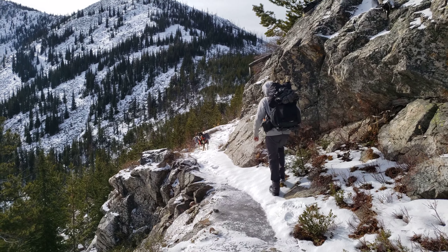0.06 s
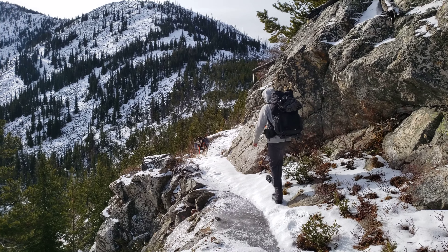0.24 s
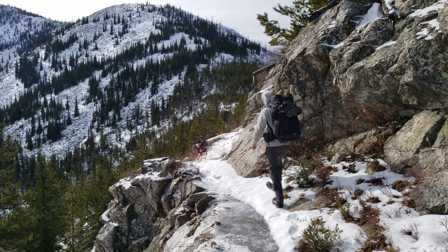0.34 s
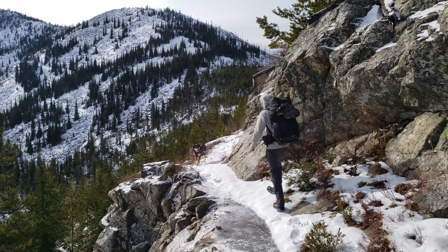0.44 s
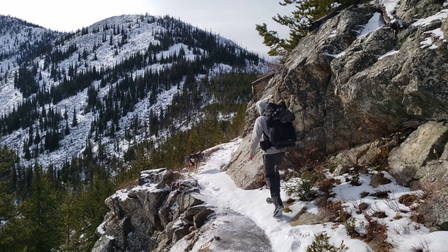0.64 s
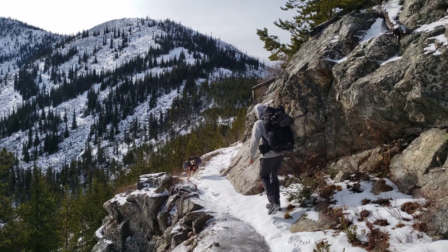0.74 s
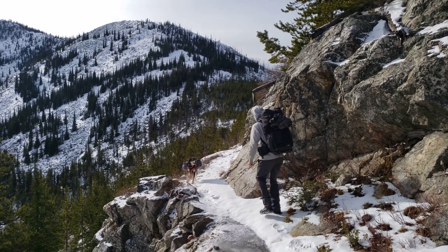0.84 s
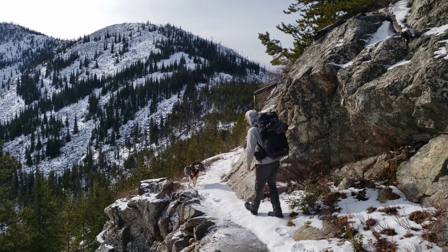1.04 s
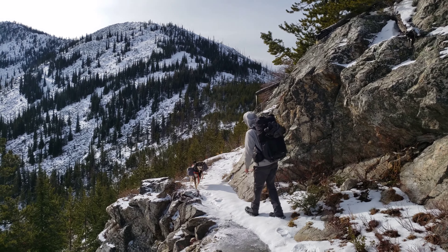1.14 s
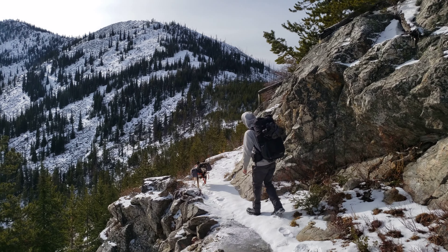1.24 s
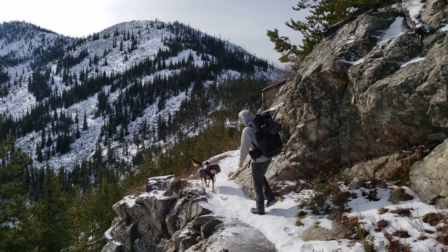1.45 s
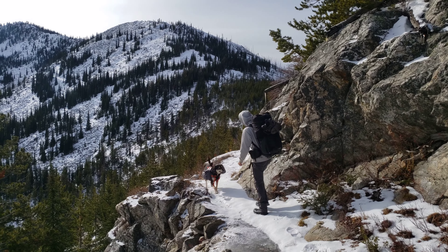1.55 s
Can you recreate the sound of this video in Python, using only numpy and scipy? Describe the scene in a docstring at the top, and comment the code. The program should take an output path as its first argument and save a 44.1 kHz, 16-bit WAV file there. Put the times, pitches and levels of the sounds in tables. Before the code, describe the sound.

Irregular snow footsteps, close to a stereo outdoor microphone: a soft scuff with cloth rustle, then sharper crunches and a heavy thud amid wind rumble, finally faint scuffs and a brighter jingle of collar tags.

```python
"""Packed, icy snow trail in open air: a hiker walks behind a dog whose collar tags jingle.
Boots crunch, scuff and thud: noise bursts for crust and slides, damped low swings for blows.
Cloth rubs close to the left microphone as grainy noise with swelling resonances; a fine hiss flickers.
Tags ring as decaying sines with scattered copies; ice snaps are brief ticks.
Gusts of wind buffet each microphone port on its own, as low noise under separate level curves."""
import sys
import numpy as np
from scipy import signal
from scipy.fft import rfft, irfft
from scipy.io import wavfile
from scipy.ndimage import uniform_filter1d

SR = 44100
rng = np.random.default_rng(int(sys.argv[2]) if len(sys.argv) > 2 else 0)


def pcm_store(signal):
    """Save signal as 16-bit PCM."""
    levels = np.round(np.clip(np.atleast_2d(signal), -1, 1) * 32767)
    wavfile.write(sys.argv[1], SR, levels.astype(np.int16).T)


N = 70560
TIME = np.arange(N) / SR


def amp(db):
    """Converts decibels to gain."""
    return 10 ** (np.asarray(db) / 20)


def evened(x):
    """Scales to an rms of one."""
    return x / np.sqrt(np.mean(x ** 2) + 1e-20)


def curve(points):
    """Gain over time, interpolated in dB from (time_s, level_db) points."""
    return amp(np.interp(TIME, *np.transpose(points)))


def add(mix, start_s, sound):
    """Adds a stereo sound to the mix in place, cut off at the end."""
    part = mix[:, max(round(start_s * SR), 0):][:, :sound.shape[1]]
    part += sound[:, :part.shape[1]]


def colour(x, table, bass_db=0, treble_db=0, size=4096):
    """Minimum-phase filter per table channel; the first has unit power before bass and treble shelves."""
    bass_hz, treble_hz = 603, 3450
    hz = abs(np.fft.fftfreq(size, 1 / SR)) + 1
    table_hz, *columns_db = np.transpose(table)
    gain = amp([np.interp(np.log(hz), np.log(table_hz), column) for column in columns_db])
    gain = gain / np.sqrt(np.mean(gain[0] ** 2))
    bass_shelf_db = bass_db / (1 + (hz / bass_hz) ** 2)
    treble_shelf_db = treble_db / (1 + (treble_hz / hz) ** 2)
    gain = gain * amp(bass_shelf_db + treble_shelf_db)
    # phase from the Hilbert transform of log gain
    spectrum = np.exp(np.conj(signal.hilbert(np.log(gain + 1e-6))))
    taps = np.fft.ifft(spectrum).real[:, :size // 2]
    return signal.fftconvolve(np.atleast_2d(x), taps, axes=1)[:, :x.shape[-1]]


def grains(n, grain_db, grain_s, same):
    """Two noises, correlated by same, whose shared level wanders in dB between knots grain_s apart."""
    knots = rng.standard_normal(N)
    wander = np.interp(np.arange(n) / SR / grain_s, np.arange(N), knots)
    burst = amp(grain_db * np.clip(wander, -2, 2))
    a, b = rng.standard_normal((2, N))[:, :n]
    right = same * a + np.sqrt(1 - same ** 2) * b
    return evened(burst * np.array([a, right]))


def resonate(x, hz, width_hz):
    """Steep resonance following hz: shift to zero, low-pass, shift back; scaled to an rms of one."""
    turn = np.exp(2j * np.pi * np.cumsum(hz * np.ones(N)) / SR)
    b, a = signal.butter(2, width_hz / 2, fs=SR)
    return evened((turn * signal.lfilter(b, a, x / turn)).real)


def muffled(x):
    """The right port hears a weaker, duller sound; the left is unchanged."""
    # loss at the right port: freq_hz, gain_db
    right_shade = [(400, -8), (1300, -17.5), (2300, -15.5), (4000, -22), (6500, -41.5), (10500, -13),
                   (14000, -49)]
    shade_hz, shade_db = np.transpose(right_shade)
    hz = np.fft.rfftfreq(2 * N, 1 / SR) + 1
    gain = amp(np.interp(np.log(hz), np.log(shade_hz), shade_db))
    right = irfft(rfft(x[1], 2 * N) * gain)[:N]
    return np.array([x[0], right])


def wind():
    """Eddies thump on each port separately: low noise, levelled, then driven by that port's gusts."""
    # wind pressure per port: time_s, level_db
    gust_left = [(0, -48), (.2, -44), (.28, -36.5), (.32, -29), (.4, -45), (.445, -25.5), (.475, -36.5),
                 (.51, -26.5), (.6, -48), (.65, -28), (.71, -46.5), (.74, -25), (.815, -54), (.86, -18.5),
                 (.895, -31), (.955, -25.5), (1.01, -38), (1.05, -30), (1.115, -30), (1.18, -86)]
    gust_right = [(0, -48.5), (.25, -42), (.58, -38), (.68, -30.5), (.75, -38.5), (.92, -36.5), (1.04, -52),
                  (1.18, -43), (1.3, -53.5), (1.6, -62)]
    # buffeting spectrum before levelling: freq_hz, relative_db
    buffet = [(22, -39.5), (36, -14), (60, 6), (90, -3), (130, -9.5), (200, -20.5), (400, -39),
              (900, -58.5), (3000, -73.5)]
    eddies = colour(rng.standard_normal((2, N + SR)), buffet)[:, SR:]  # drop filter onset
    running_power = uniform_filter1d(eddies ** 2, size=1500, axis=1)
    eddies = eddies / np.sqrt(running_power + 1e-12)
    return eddies * np.array([curve(gust_left), curve(gust_right)])


def cloth():
    """Fabric slides in tiny slips; a hollow, wavering resonance and brighter swishes swell and fade."""
    # broadband rub level: time_s, level_db
    rub_level = [(0, -54), (.06, -49.5), (.2, -43.5), (.27, -38.5), (.35, -46.5), (.43, -54), (.57, -56),
                 (.67, -59.5), (.8, -72), (.92, -70), (1.35, -70.5), (1.6, -79.5)]
    # rub spectrum: freq_hz, relative_db
    rub = [(306, 0), (567, -6), (1120, -3.5), (1540, -8.5), (2570, -7.5), (4470, -8), (5830, -15.5),
           (6960, -9), (8670, -17), (12700, -11), (15800, -9.5)]
    # bright resonances: centre_hz, width_hz, peak_s, swell_s, level_db
    swishes = [(6800, 1900, 0.19, 0.049, -53), (12550, 2900, 0.27, 0.063, -52.5)]
    ring_hz, ring_width_hz, ring_waver_share = 2120, 400, .025
    ring_peak_s, ring_swell_s, ring_db = 0.26, 0.15, -53

    slips = grains(N, grain_db=2.6, grain_s=.0009, same=0.42)
    waver = evened(uniform_filter1d(rng.standard_normal(N), size=900))
    wavering_hz = ring_hz * (1 + ring_waver_share * waver)
    hollow_ring = (wavering_hz, ring_width_hz, ring_peak_s, ring_swell_s, ring_db)
    swells = 0
    for hz, width_hz, peak_s, swell_s, level_db in [hollow_ring, *swishes]:
        envelope = np.exp(-((TIME - peak_s) / swell_s) ** 2)
        swells = swells + resonate(slips, hz, width_hz) * amp(level_db) * envelope
    return colour(slips * curve(rub_level), rub) + swells


def hiss():
    """Fine, flickering hiss, mostly on the left: grainy noise, nearly independent per port."""
    # level: time_s, level_db
    hiss_level = [(0, -58.5), (.5, -55), (.66, -54.5), (.79, -56), (.92, -56), (1.07, -56), (1.15, -57.5),
                  (1.3, -54), (1.36, -75), (1.43, -62), (1.48, -57), (1.6, -55)]
    # spectrum per port: freq_hz, left_db, right_db
    hiss_colour = [(96, -56, 6.5), (286, -20, -10.5), (1390, -21.5, -26.5), (3270, -21.5, -23.5),
                   (6480, -4, -39), (8200, -14.5, -37), (10700, -5.5, -19.5), (14100, -7.5, -28)]
    noise = grains(N, grain_db=3.5, grain_s=0.0082, same=0.078)
    return colour(noise * curve(hiss_level), hiss_colour)


def tags(count=12, detune=0.0015):
    """Two small metal tags ring and flutter over a longer, low ring; rock and snow scatter the sound."""
    # knocks: start_s, level_db, upper_tag_extra_db
    clinks = [(0.014, -53, 5), (0.093, -50, 5.5), (0.338, -51, 1), (0.551, -50.5, -13), (0.684, -49.5, 1),
              (0.695, -42.5, -2.5), (0.814, -55, -4), (0.967, -51.5, -2), (1.052, -43, -4.5),
              (1.103, -54.5, 0), (1.28, -50.5, -5), (1.299, -45.5, -9.5), (1.37, -49, -2.5),
              (1.461, -48.5, -0.5), (1.524, -36.5, -4)]
    # decaying modes: pitch_hz, level_db, t60_s, tag (0 lower, 1 upper)
    tag_modes = [(6430, -28, .35, 0), (10144, 0.5, 0.11, 0), (11086, 1, .12, 1), (16100, -14, .06, 0)]
    low_hz, low_db, low_t60_s = 5510, -62, .22  # same level at every clink
    rise_s, flutter_share, flutter_s = .003, .45, .004
    scatter_gain, scatter_mean_s = .35, .015

    out, t = np.zeros((2, N)), TIME[:SR // 3]
    knots_s = np.arange(0, t[-1], flutter_s)
    for start_s, clink_db, upper_db in clinks:
        ring = 0
        for hz, mode_db, t60_s, tag in tag_modes:
            flutter = 1 + flutter_share * np.interp(t, knots_s, rng.standard_normal(len(knots_s)))
            tone = np.sin(2 * np.pi * hz * (1 + detune * rng.standard_normal()) * t)
            ring = ring + flutter * tone * amp(mode_db + upper_db * tag - 60 * t / t60_s)
        low_ring = np.sin(2 * np.pi * (low_hz * t + rng.random())) * amp(low_db - 60 * t / low_t60_s)
        rise = np.minimum(t / rise_s, 1)
        ring = (ring * amp(clink_db) + low_ring) * rise * np.ones((2, 1))
        add(out, start_s, ring)
        delays_s = rng.exponential(scatter_mean_s, count)
        for delay_s, left, right in zip(delays_s, *rng.standard_normal((2, count))):
            echo = ring * np.array([[left], [right]]) * scatter_gain / np.sqrt(count)
            add(out, start_s + delay_s, echo)
    return out


def crunches():
    """Icy crust gives way in a dense burst of cracks; crumbs settle in a weaker, decaying tail."""
    # breaks: start_s, length_s, level_db, extra_bass_db, extra_treble_db
    breaks = [(0.034, 0.021, -51.5, 1, 8), (0.258, 0.0025, -41, 7, -21), (0.544, 0.0074, -39.5, -2, 0),
              (0.5807, 0.0038, -29, -5.5, -4.5), (0.586, 0.0088, -30, -5.5, -1.5),
              (0.643, 0.041, -42.5, -11, -17), (0.8567, 0.0047, -30, -5, 1.5), (1.004, 0.03, -52, -6.5, -4),
              (1.064, 0.019, -51.5, -8, -0.5), (1.144, 0.011, -51.5, 11.5, -5)]
    # crust spectrum before shelves: freq_hz, relative_db
    crust = [(62, -1.5), (280, 9.5), (620, -0.5), (1650, -14.5), (2330, -7), (3100, -17.5), (4800, -7.5),
             (7700, -9), (9100, -27.5), (12600, -19), (15500, -17)]
    tail_db, tail_s, rise_s = -27, .018, .0005

    out, t = np.zeros((2, N)), TIME[:SR // 6]
    for start_s, length_s, level_db, bass_db, treble_db in breaks:
        shape = np.exp(-(t / length_s) ** 2) + amp(tail_db) * np.exp(-t / tail_s)
        shape = shape * np.minimum(t / rise_s, 1)
        cracks = grains(len(t), grain_db=4, grain_s=0.00042, same=0.97) * shape
        cracks = evened(cracks) * np.sqrt(np.mean(shape ** 2))  # same energy for every draw
        add(out, start_s, amp(level_db) * colour(cracks, crust, bass_db, treble_db))
    return out


def snaps():
    """Brittle ice snaps: a bright sine tick that dies within a few cycles."""
    # ticks: start_s, level_db (before decay)
    ticks = [(0.0356, -23.5), (.6095, -26.5)]
    pitch_hz, decay_s = 5840, 0.00031
    out, t = np.zeros((2, N)), TIME[:SR // 20]
    for start_s, level_db in ticks:
        tick = np.sin(2 * np.pi * pitch_hz * t) * np.exp(-t / decay_s)
        add(out, start_s, amp([[level_db], [level_db]]) * tick)
    return out


def scuff():
    """Dull slides over packed snow: grainy noise with attack, hold and release."""
    # slides: start_s, rise_s, end_s (hold ends), fall_s, level_db, right_extra_db
    slides = [(0.284, 0.021, 0.32, 0.097, -40, -1.5), (0.418, 0.0069, 0.59, 0.13, -51.5, -2.5),
              (1.142, 0.018, 1.283, 0.017, -63, 13), (1.171, 0.062, 1.276, 0.061, -52, -2),
              (1.375, 0.0039, 1.41, 0.035, -67.5, 8.5)]
    # spectrum per port: freq_hz, left_db, right_db
    scuff_colour = [(122, -1.5, 7.5), (310, 4, 4), (595, 4, -4), (864, -9.5, -17), (2380, -14, -23),
                    (7200, -16.5, -41.5), (11700, -26.5, -30), (15300, -27, -39)]
    shape = 0
    for start_s, rise_s, end_s, fall_s, level_db, right_db in slides:
        attack = np.clip((TIME - start_s) / rise_s, 0, 1)
        release = np.clip(1 - (TIME - end_s) / fall_s, 0, 1)
        shape = shape + amp([[level_db], [level_db + right_db]]) * attack * release
    noise = grains(N, grain_db=2, grain_s=0.0036, same=0.74)
    return colour(noise * shape, scuff_colour)


def thuds():
    """Soft blows of feet and gear: each a heavily damped swing that sags in pitch."""
    # blows: start_s, level_db (before rise and decay), start_pitch_hz, decay_s, left_minus_right_db
    blows = [(0.303, -25.5, 206, 0.0034, 7), (0.564, -29, 203, 0.0024, -1), (0.846, -26, 74, 0.0053, 25),
             (.856, -20.5, 373, 0.0045, 6), (.874, -17.5, 111, 0.0033, 5), (1.143, -32.5, 261, 0.0068, 5.5),
             (1.323, -49.5, 250, 0.0093, -17), (1.38, -44.5, 200, 0.0039, -28),
             (1.592, -49.5, 210, 0.014, -16)]
    rise_share, sag_share = .4, .25  # of the decay time; of the starting pitch
    out, t = np.zeros((2, N)), TIME[:SR // 6]
    for start_s, level_db, hz, decay_s, pan_db in blows:
        decay = np.exp(-t / decay_s)
        turns = np.cumsum(hz * (1 - sag_share * (1 - decay))) / SR
        rise = 1 - np.exp(-(t / (rise_share * decay_s)) ** 2)
        swing = np.sin(2 * np.pi * turns) * rise * decay
        add(out, start_s, amp([[level_db + pan_db / 2], [level_db - pan_db / 2]]) * swing)
    return out


def scene():
    """Sums all sources in open air; the right port hears four of them muffled."""
    shaded = muffled(cloth() + tags() + crunches() + snaps())
    return wind() + hiss() + scuff() + thuds() + shaded


def record(dry):
    """The recorder's band limit: a linear-phase low-pass."""
    edge_hz = 16100
    taps = signal.firwin(511, edge_hz, window=("kaiser", 9), fs=SR)
    return signal.oaconvolve(dry, taps[None], "same")


dry = scene()
out = record(dry)
pcm_store(out)
```